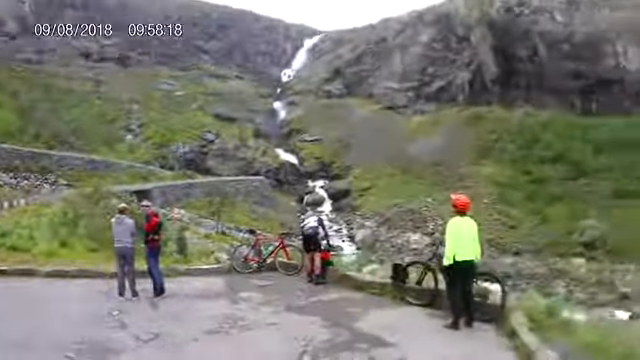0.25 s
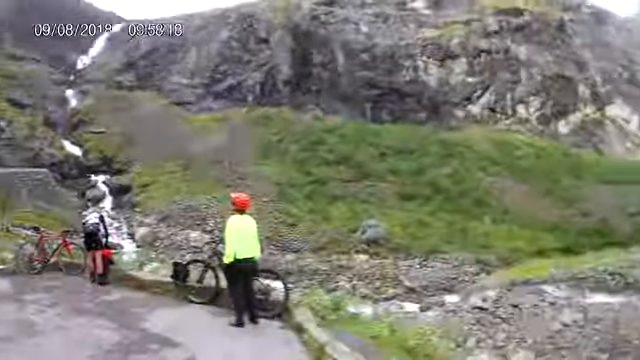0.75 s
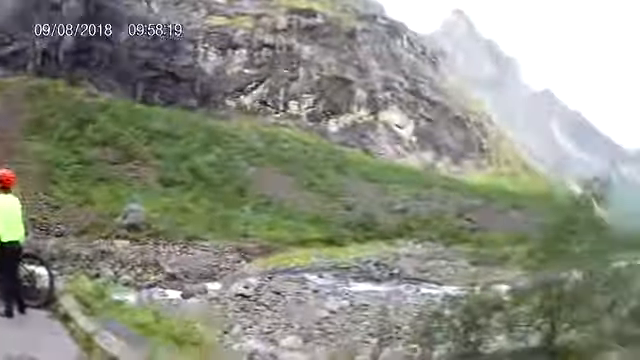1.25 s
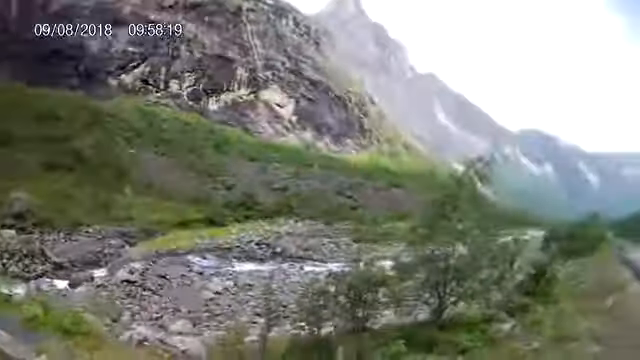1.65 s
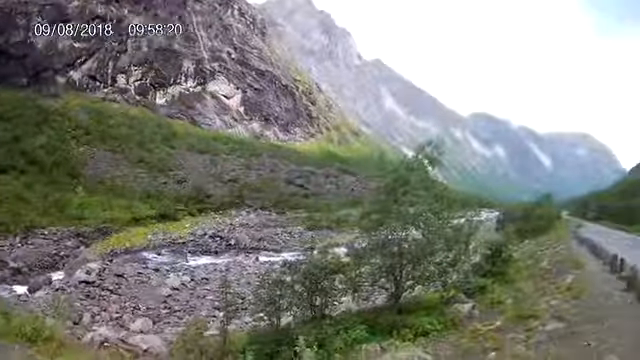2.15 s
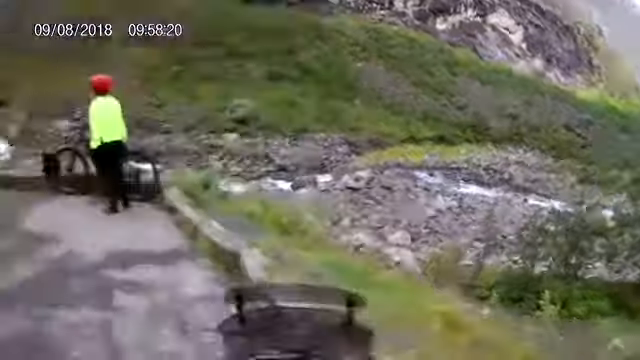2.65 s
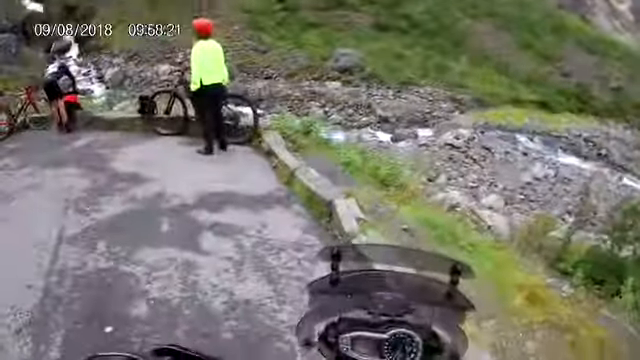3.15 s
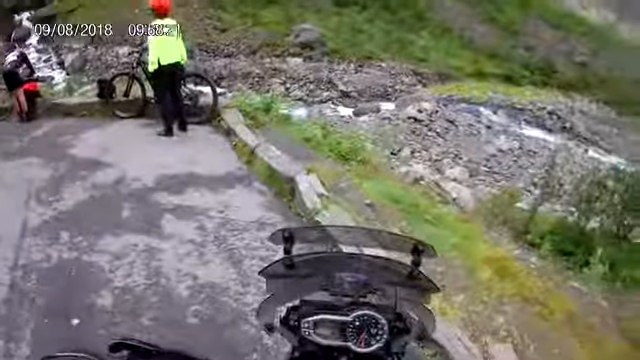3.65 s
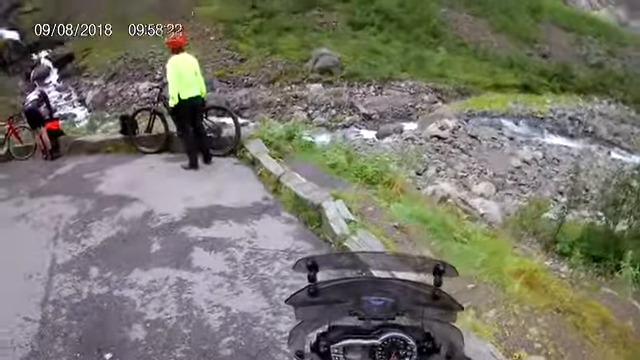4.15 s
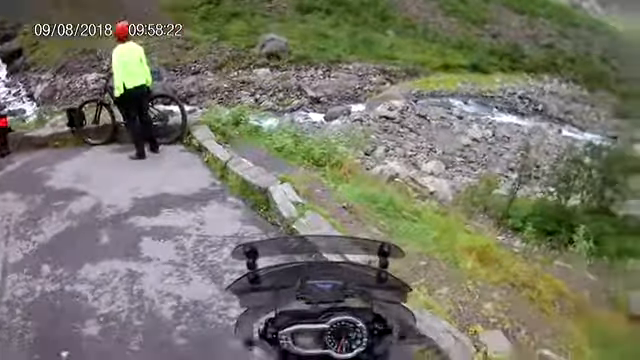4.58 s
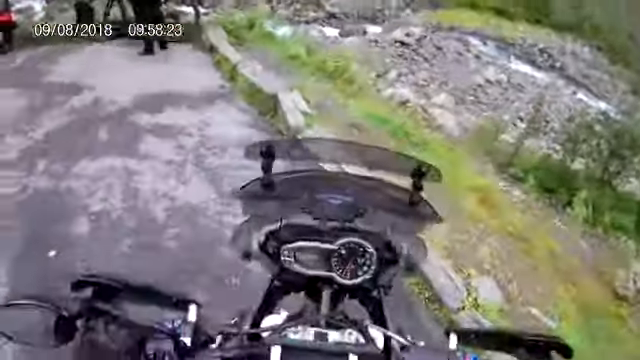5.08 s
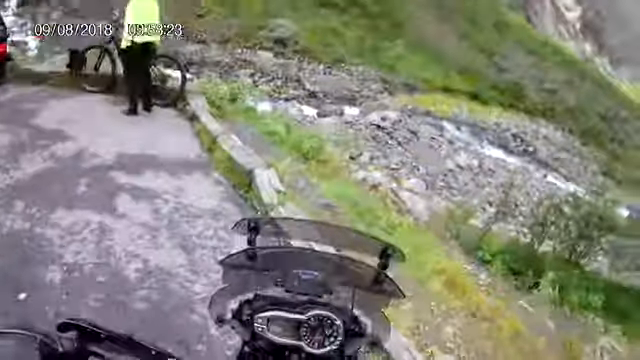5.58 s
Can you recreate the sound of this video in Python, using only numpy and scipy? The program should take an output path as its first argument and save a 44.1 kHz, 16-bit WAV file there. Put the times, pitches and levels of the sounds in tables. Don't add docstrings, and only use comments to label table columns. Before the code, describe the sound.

Beside a mountain river, a microphone sealed in a helmet camera case hears quiet, continuous rushing water, boxy and muffled, its low roar easing slightly as the head turns away around 1.5-2.5 s, then returning partway. Beneath it run soft, rapid low thuds, about ten a second with uneven heavier ones, like a distant idle but made by the camera's circuits, plus tiny ticks. A very faint, flickering high whine grows at 2.6 s. Fingertips tap lightly at 3.7 s; a glove touches the helmet from 4.0 s. From 4.36 to 4.85 s come very loud, close knocks: hard shell clacks, hollow thuds, scraping and deep thumps from the swinging mount, hardest and overloaded at 4.7-4.8 s, with a harsh, bright buzz from a loose clip. From 5.04 s to the end near 5.8 s, much quieter taps, dull bumps and rubbing continue over the water.

```python
import sys
import numpy as np
from scipy import signal
from scipy.fft import rfft, irfft, next_fast_len
from scipy.io import wavfile
from scipy.ndimage import uniform_filter1d

SR = 44100
rng = np.random.default_rng(int(sys.argv[2]) if len(sys.argv) > 2 else 0)


def amp(db):
    return 10 ** (np.asarray(db, float) / 20)


def write(x):
    x = np.atleast_2d(x).T
    wavfile.write(sys.argv[1], SR, np.round(np.clip(x, -1, 1) * 32767).astype(np.int16))


N = 256648


def level(x, db):
    return x * amp(db) / np.sqrt(np.mean(x ** 2))


def band(x, hz, width_hz):
    return signal.lfilter(*signal.iirpeak(hz, hz / width_hz, fs=SR), x)


def body(x, modes):
    return sum(amp(db) * band(x, hz, width_hz) for hz, width_hz, db in modes)


def steep(low_hz, high_hz):
    return signal.butter(4, [low_hz, high_hz], "band", fs=SR, output="sos")


def tint(x, spectrum):
    hz, db = np.transpose(spectrum)
    size = next_fast_len(len(x))
    bin_hz = np.fft.rfftfreq(size, 1 / SR)
    gain = amp(np.interp(np.log(bin_hz + 1), np.log(hz), db))
    return irfft(rfft(x, size) * gain, size)[:len(x)]


def walk(rate_hz):
    hold = int(SR / rate_hz)
    steps = np.repeat(rng.standard_normal(N // hold + 1), hold)
    return uniform_filter1d(uniform_filter1d(steps, hold), hold)[:N]


def add(out, start_s, piece):
    i = max(int(start_s * SR), 0)
    out[i:i + len(piece)] += piece[:max(N - i, 0)]


def burst(decay_ms, peak_db, modes, edges_hz, size=2600):
    t_ms = np.arange(size) * 1000 / SR
    envelope = np.minimum(t_ms / 1.33, 1) * np.exp(-t_ms / decay_ms)
    y = body(rng.standard_normal(size) * envelope, modes)
    y = signal.sosfilt(steep(*edges_hz), y)
    return y * amp(peak_db) / np.abs(y).max()


# pitch_hz, level_db (per Hz)
WATER = [(12, -37), (20, 4), (77, -3), (543, -17), (979, -15), (1090, -11.5), (1460, -19.5), (1630, -16),
         (2710, -31.5), (4060, -32.5), (7940, -40), (10700, -40), (12200, -43), (15900, -78), (22000, -120)]
# pitch_hz, width_hz, level_db (over the water)
CASE_CAVITIES = [(287, 29, -6.5), (773, 190, -5.5), (1170, 270, -5.5), (1620, 304, -9), (2213, 140, -4),
                 (3830, 140, -17)]
# time_s, turn (1 toward, -1 away)
HEAD_TURN = [
    (0, 1),
    (1.3, 0.17),
    (1.7, 0.0045),
    (2.5, -0.7),
    (3, -0.17),
    (5.82, 0.22),
]


def river():
    river_db = -53
    spray_turn_db, roar_turn_db, rumble_turn_db = -0.2, 2.5, 2.5
    turn_s, turn = np.transpose(HEAD_TURN)
    turn = np.interp(np.arange(N) / SR, turn_s, turn)
    water = tint(rng.standard_normal(N), WATER)
    water = level(water + body(water, CASE_CAVITIES), river_db)
    swell, size = walk(2.2), next_fast_len(N)
    bin_hz, spectrum = np.fft.rfftfreq(size, 1 / SR), rfft(water, size)
    edges_hz = np.append(0, 50 * 2 ** (np.arange(18) / 2))
    out = np.zeros(N)
    for low, high in zip(edges_hz, edges_hz[1:]):
        if high < 210:
            turn_db = rumble_turn_db
        elif high < 950:
            turn_db = roar_turn_db
        else:
            turn_db = spray_turn_db
        db = turn_db * turn + 0.14 * swell + 1.9 * walk(12)
        inside = (bin_hz >= low) & (bin_hz < high)
        out += amp(db) * irfft(spectrum * inside, size)[:N]
    return out


# start_s (into the frame), dip_db, dip_ms, tick_hz, tick_db
FRAME_CHORES = [
    (.007, -57, 5.3, 3360, -67),
    (0.014, -55, 3.7, 3300, -91),
    (.0315, -48.5, 8.1, 4250, -63.5),
    (.062, -61, 6, 3400, -65),
    (0.076, -55.5, 9.1, 4080, -62),
]
# start_s, level_db
HEAVY_DIPS = [(.142, -43), (0.174, -45), (0.263, -47), (0.351, -45), (0.412, -36), (.784, -36),
              (1.331, -44), (1.411, -31.5), (1.502, -39), (1.582, -37), (1.677, -40), (1.886, -35.5),
              (1.986, -37.5), (2.086, -39), (2.395, -31.5), (2.874, -41.5), (3.578, -43.5), (3.732, -44),
              (3.875, -45), (3.908, -42.5), (3.976, -41)]


def circuits():
    frame_s, beacon_s, beacon_start_s = 0.1, 0.1024, 0.027
    beacon_db, beacon_scatter_db = -41.5, 1.8
    strong_beacons, strong_beacon_db = (7, 11, 16, 31), 5.5
    sag, ticks = np.zeros(N), np.zeros(N)
    dips = []  # start_s, level_db, width_ms
    for k, s in enumerate(np.arange(beacon_start_s, N / SR, beacon_s)):
        db = beacon_db + beacon_scatter_db * rng.standard_normal()
        dips.append((s, db + strong_beacon_db * (k in strong_beacons), 4.2))
    for s, db in HEAVY_DIPS:
        dips.append((s, db, 9.5 + 0.76 * (db + 40.5)))
    for frame_start_s in np.arange(0, N / SR, frame_s):
        for s, db, ms, tick_hz, tick_db in FRAME_CHORES:
            dips.append((frame_start_s + s, db + 1.3 * rng.standard_normal(), ms))
            modes = [(tick_hz, 0.1 * tick_hz, 0), (7000, 6000, -22)]
            tick = burst(4.2, tick_db + 2 * rng.standard_normal(), modes, (2500, 12000), size=600)
            add(ticks, frame_start_s + s - 0.002, tick)
    for place, depth, width in rng.random((220, 3)):
        dips.append((place * N / SR, -59 + 8 * depth, 4 + 6 * width))
    for s, db, ms in dips:
        add(sag, s - ms / 2000, -amp(db) * np.hanning(int(ms * SR / 1000)))
    return signal.lfilter(*signal.butter(1, 22, "high", fs=SR), sag) + ticks


def whine():
    pitch_hz, width_hz, flicker_db = 3340, 260, 6
    quiet_db, rise_db, rise_s, rise_length_s = -84.5, 8.5, 2.6, 0.064
    tone = band(band(rng.standard_normal(N), pitch_hz, width_hz), pitch_hz, width_hz)
    tone = level(tone * amp(flicker_db * walk(45)), 0)
    rise = 1 / (1 + np.exp((rise_s - np.arange(N) / SR) / rise_length_s))
    return tone * amp(quiet_db + rise_db * rise)


# start_s, peak_db, pitch_hz (colour)
FINGER_TAPS = [(3.694, -39.5, 1170), (3.754, -47, 1030), (4.072, -32.5, 1630), (4.159, -38.5, 1050),
               (5.039, -37, 1210), (5.079, -45, 1380), (5.221, -39.5, 1350), (5.242, -31.5, 920),
               (5.275, -36.5, 690), (5.294, -35.5, 800), (5.326, -38, 1230), (5.361, -31.5, 845),
               (5.38, -37, 1350), (5.439, -38, 1450), (5.464, -38, 1410), (5.477, -35.5, 880),
               (5.51, -44, 1050), (5.602, -33, 1420), (5.673, -35, 780), (5.755, -48, 1186)]
# start_s, peak_db, pitch_hz (colour), burst_ms, thud_db (hollow, over the peak)
SHELL_KNOCKS = [(4.364, -39.5, 1160, 7.5, 8.5), (4.377, -28.5, 1010, 4.4, -0.5),
                (4.415, -34.5, 840, 6.3, -1), (4.451, -19, 730, 5.5, -7), (4.4555, -8.5, 1005, 2, -7),
                (4.49, -20.5, 1540, 2.3, -16), (4.503, -14, 1420, 13, -25), (4.522, -33, 1620, 5.4, 9),
                (4.531, -19, 640, 2, 5), (4.5352, -11, 1330, 4.9, -8), (4.5397, -11.5, 675, 3, -8),
                (4.575, -20.5, 1960, 4.5, -9), (4.584, -21, 1820, 6.3, -18), (4.603, -24.5, 2000, 2.1, -7),
                (4.653, -41, 1060, 5.3, 5), (4.679, -23.5, 1050, 13, -2), (4.695, -19, 860, 1.9, -2),
                (4.704, -14.5, 750, 8.7, 0.5), (4.7451, -7.5, 860, 4.1, -11.5), (4.754, -18, 900, 6.5, 4.5),
                (4.765, -16, 730, 8.9, 3), (4.781, -23.5, 760, 5.3, -2), (4.817, -31.5, 720, 6.9, 0),
                (4.849, -44.5, 692, 6.1, 11)]
# pitch_hz, width_hz, level_db
SHELL_MODES = [(693, 78, 20), (850, 180, 19), (1173, 240, 19), (1420, 130, 19.5), (1523, 107, 15),
               (2300, 89, -22)]
# pitch_hz, width_hz, level_db
HOLLOW_MODES = [(231, 85, -7), (270.7, 52, -0.5), (429, 174, -14)]
# pitch_hz, level_db (per Hz)
PADDING_RUSTLE = [(1500, -44.5), (2500, 7), (4000, -0.5), (5500, 3.5), (7000, -23), (8000, -6),
                  (9500, -2.5), (12000, -5.5), (13000, -41.5)]


def shell():
    tap_ms = 5.5
    out, cracks = np.zeros(N), np.zeros(N)
    taps = [(s, db, hz, tap_ms, -4.5 - 7 * np.log2(hz / 1000)) for s, db, hz in FINGER_TAPS]
    crack_modes = [(3530, 920, 18), (5200, 1700, -16), (9500, 3000, -15)]
    for s, db, hz, ms, thud_db in SHELL_KNOCKS + taps:
        crack_db = -22 + 0.15 * (db + 34) - 0.64 * (ms - tap_ms)
        near = [(f, w, g - 6 * abs(np.log2(f / hz))) for f, w, g in SHELL_MODES]
        near.append((hz, 500, -4))
        add(out, s, burst(max(ms, 0.5), db, near, (0.41 * hz + 200, 1.14 * hz + 500)))
        add(out, s, burst(4.4, db + thud_db + 0.5, HOLLOW_MODES, (140, 400)))
        crack = burst(max(0.61 * ms, 0.5), db + crack_db - 4, crack_modes, (2500, 11000))
        add(cracks, s, crack)
    energy = uniform_filter1d((out + 12 * cracks) ** 2, size=2100)
    rustle = level(tint(rng.standard_normal(N), PADDING_RUSTLE), -31.5)
    return out + cracks + np.sqrt(np.maximum(energy, 0)) * rustle


# start_s, length_s, pressure_db
GLOVE_GRIPS = [
    (4.02, .2, -56),
    (4.418, 0.17, -38.5),
    (4.653, .15, -35),
    (5.036, 0.12, -53),
    (5.202, 0.284, -46.5),
    (5.572, 0.15, -50.5),
]
# level_db (at middling pressure), growth (with pressure), release_t60_s
GLOVE_RUBS = [
    (-46, 1.11, 0.18),
    (-46.5, 1.16, 0.19),
    (-46, 0.7, 1),
    (-73.5, .4, .3),
]


def glove():
    attack_s = 0.03
    t = np.arange(N) / SR
    grain_db = rng.standard_exponential(N // 128 + 1).repeat(128)[:N]
    grains = rng.standard_normal((4, N)) * amp(2.63 * uniform_filter1d(grain_db, 64))
    bodies = ((SHELL_MODES, 600, 2000), (HOLLOW_MODES, 130, 400),
              ([(84, 40, 0)], 40, 140), ([(4000, 2500, 0)], 2400, 6500))
    out = np.zeros(N)
    for grain, (modes, low_hz, high_hz), (db, growth, t60) in zip(grains, bodies, GLOVE_RUBS):
        hold = np.zeros(N)
        for s, length, pressure_db in GLOVE_GRIPS:
            attack = np.clip((t - s) / attack_s, 0, 1) ** 2
            release_db = -60 * np.maximum(t - s - length, 0) / t60
            hold += attack * amp(growth * (pressure_db + 43.5) + release_db)
        rub = signal.sosfilt(steep(low_hz, high_hz), body(grain, modes))
        out += hold * level(rub, db)
    return out


# start_s, level_db, pitch_hz, t60_s
MOUNT_FLICKS = [(4.054, -28.5, 84, 0.085), (4.159, -33.5, 86, 0.074), (4.323, -39.5, 128, 0.15),
                (4.365, -21.5, 88.3, 0.18), (4.38, -17.5, 87.3, 0.35), (4.453, -7, 93, 0.1),
                (4.4573, -11.5, 273.6, 0.077), (4.519, -14.5, 84, 0.12), (4.537, -10.5, 68.3, 0.016),
                (4.554, -14, 84, 0.053), (4.797, -18.5, 76.6, 0.28), (4.878, -32, 130, 0.045),
                (5.044, -31, 83.5, 0.11), (5.078, -37, 88.5, 0.38), (5.274, -30.5, 94, .12),
                (5.399, -35.5, 89.7, 0.11), (5.548, -32.5, 109, 0.024), (5.67, -29, 84, .026),
                (5.699, -28, 87.7, 0.16)]
# start_s, level_db, pitch_hz, driven_s, t60_s
MOUNT_PULLS = [
    (4.118, -45, 79.6, 0.0085, 0.05),
    (4.190, -34, 59.6, 0.007, 0.07),
    (4.573, -14.5, 85, .02, 0.036),
    (4.682, -15, 74, 0.017, 0.076),
    (4.706, -5.5, 79.2, 0.03, 0.058),
    (4.7522, 0, 82.5, .026, 0.031),
    (5.357, -25, 90.6, 0.013, 0.05),
    (5.677, -21, 84, 0.011, 0.045),
]


def mount():
    flick_s = 0.0061
    out, t = np.zeros(N), np.arange(SR // 3) / SR
    swings = [(s, db, hz, flick_s, t60, 1) for s, db, hz, t60 in MOUNT_FLICKS]
    swings += [(*pull, -1) for pull in MOUNT_PULLS]
    for s, db, hz, driven_s, t60, direction in swings:
        onset = np.sin(np.minimum(t / 0.0033, 1) * np.pi / 2) ** 2
        decay = amp(-60 * np.maximum(t - driven_s, 0) / t60)
        add(out, s, direction * amp(db) * onset * decay * np.sin(2 * np.pi * hz * t))
    return out


# start_s, peak_db
CLIP_STRIKES = [(4.695, -23.5), (4.700, -15.5), (4.7045, -12.5), (4.7168, -15.5), (4.7245, -15.5),
                (4.7413, -23.5), (4.754, -6.5), (4.7605, -14), (4.765, -14), (4.771, -8), (4.7789, -21),
                (4.7842, -24.5), (4.7864, -21.5), (4.7894, -18.5), (4.797, -38), (4.8104, -49)]
CLIP_MODES = [(4070, 250, 1), (4210, 220, 7.5), (4200, 250, -6.5)]
# pitch_hz, level_db (per Hz)
CLIP_FIZZ = [(1470, 5), (2500, -8), (3460, -15), (4310, -10.5), (4760, -25), (6580, -16), (7980, -35),
             (9360, -20), (11200, -23), (12200, -34.5), (15900, -61), (22000, -120)]


def clip_buzz():
    ring, fizz = np.zeros(N), np.zeros(N)
    for s, db in CLIP_STRIKES:
        add(ring, s, burst(1.0, db - 0.8, CLIP_MODES + [(4360, 1300, -14)], (2500, 6800)))
        fizz_db = -28.5 + 0.64 * (db + 17)
        add(fizz, s, burst(7.8, fizz_db, [(7240, 18400, 0)], (2000, 12500)))
    return ring + amp(18.5) * tint(fizz, CLIP_FIZZ)


def scene():
    camera = circuits() + whine()
    handling = shell() + glove() + mount() + clip_buzz()
    return (river() + camera + handling)[None]


def roll_off(x):
    return signal.sosfilt(signal.butter(12, 12350, fs=SR, output="sos"), x)


def record(dry):
    knee = 8
    rounded = dry / (1 + np.abs(dry) ** knee) ** (1 / knee)
    return roll_off(rounded)


dry = scene()
out = record(dry)
write(out)
```